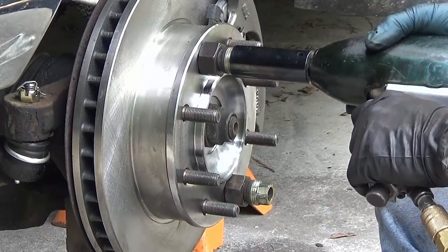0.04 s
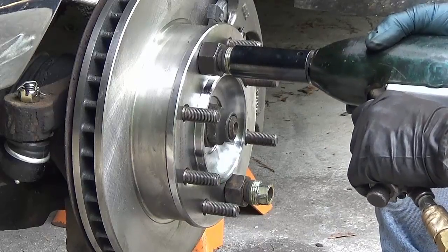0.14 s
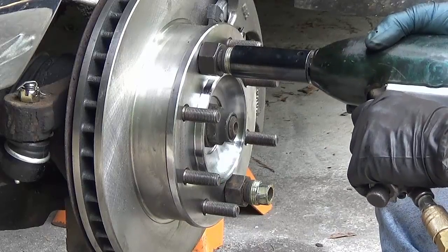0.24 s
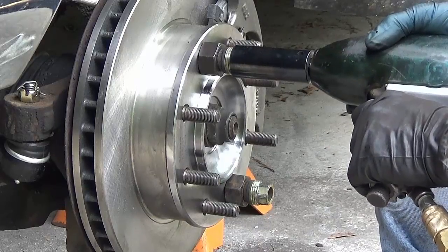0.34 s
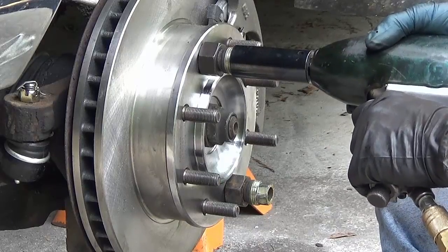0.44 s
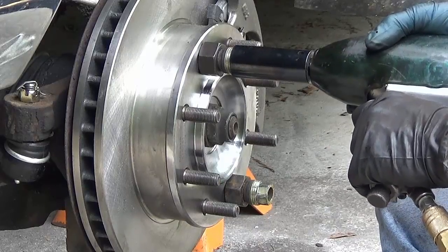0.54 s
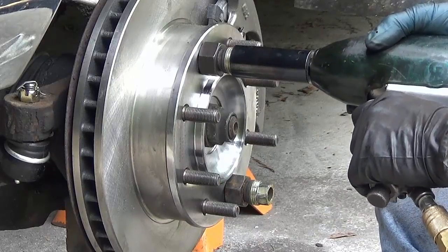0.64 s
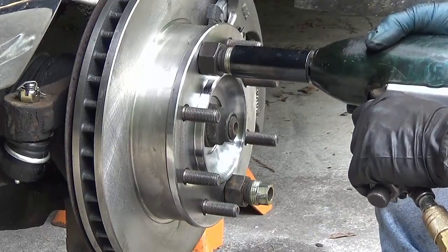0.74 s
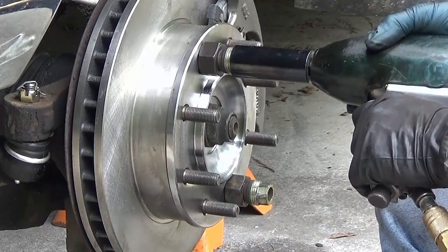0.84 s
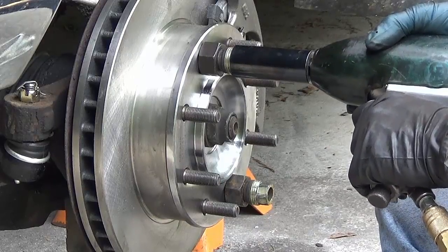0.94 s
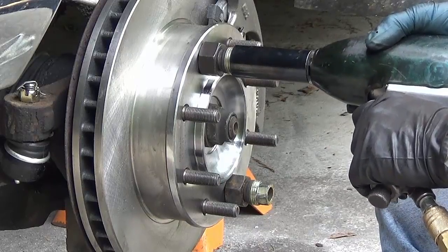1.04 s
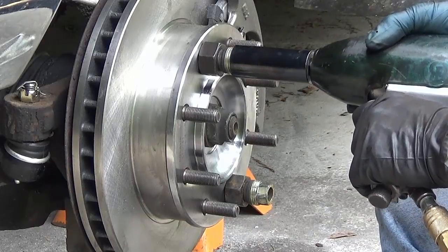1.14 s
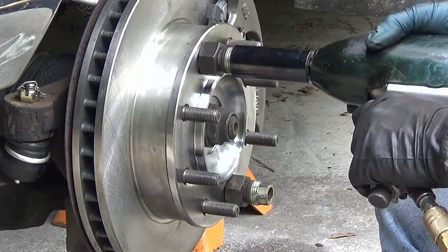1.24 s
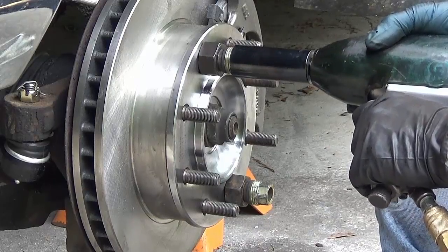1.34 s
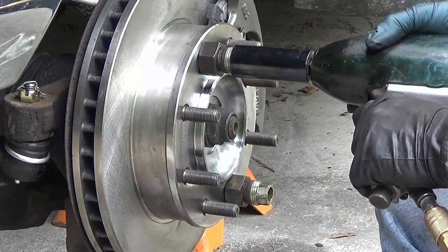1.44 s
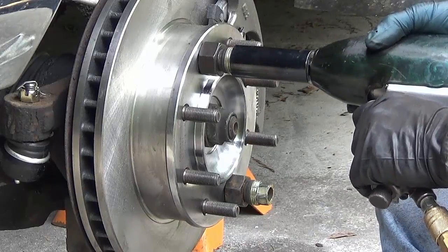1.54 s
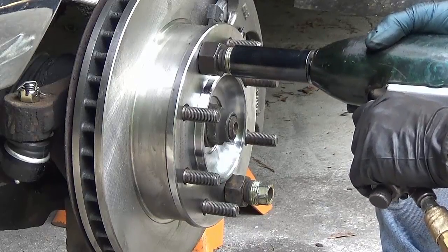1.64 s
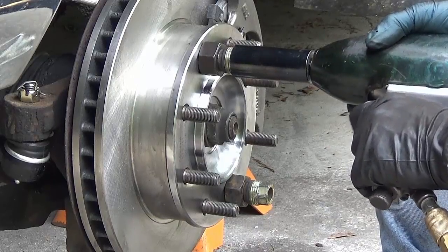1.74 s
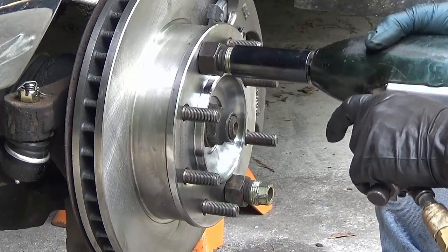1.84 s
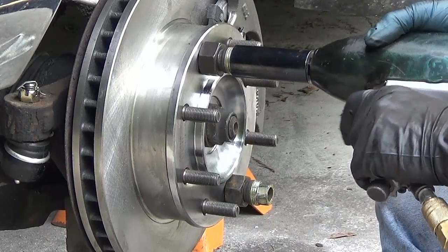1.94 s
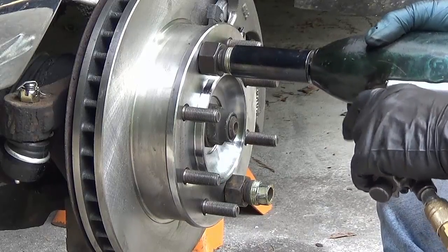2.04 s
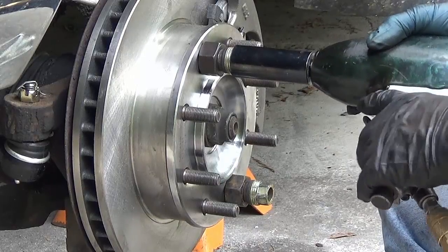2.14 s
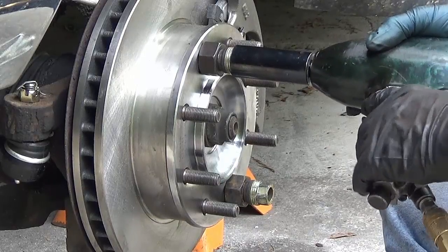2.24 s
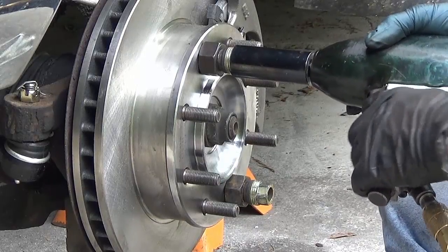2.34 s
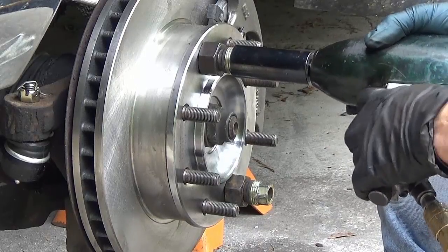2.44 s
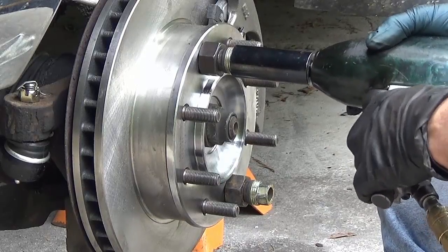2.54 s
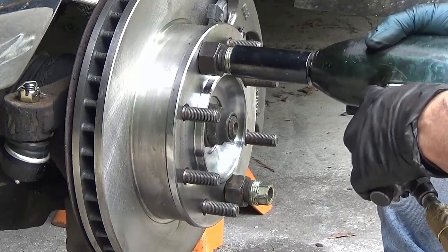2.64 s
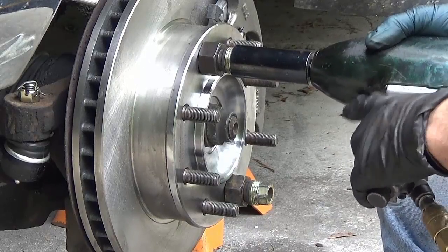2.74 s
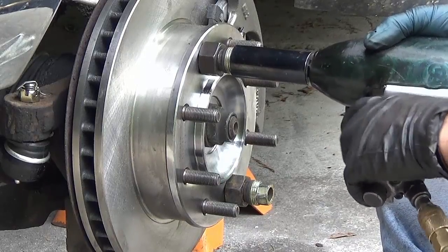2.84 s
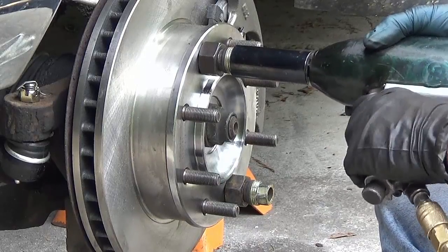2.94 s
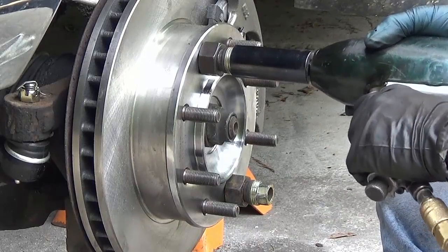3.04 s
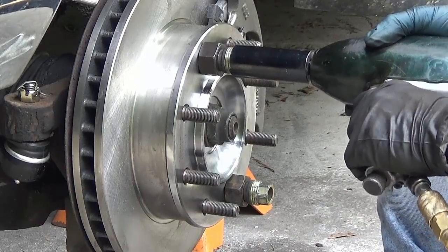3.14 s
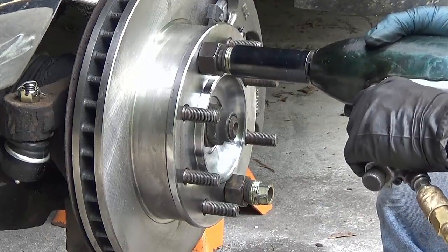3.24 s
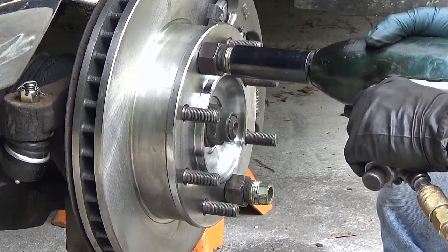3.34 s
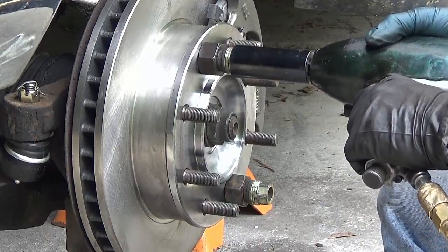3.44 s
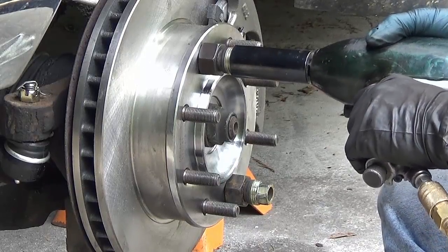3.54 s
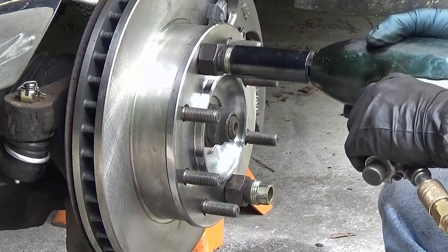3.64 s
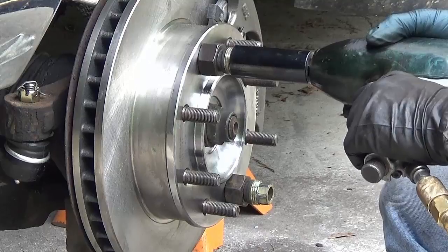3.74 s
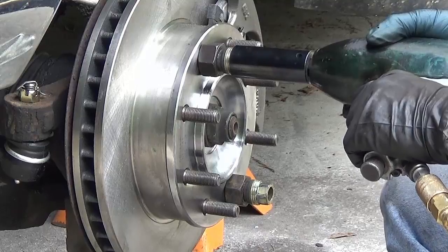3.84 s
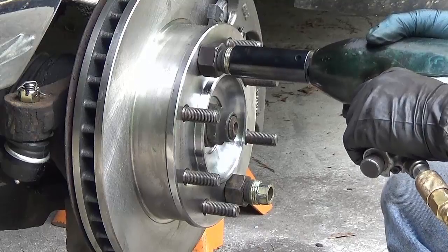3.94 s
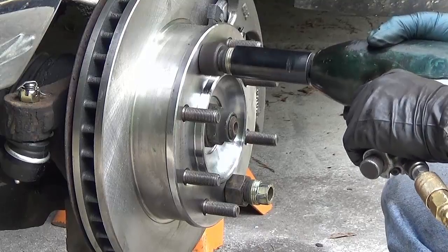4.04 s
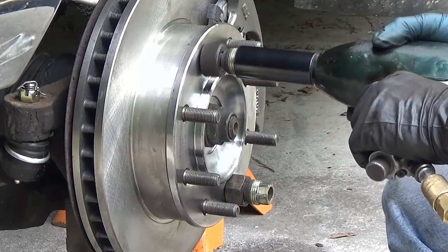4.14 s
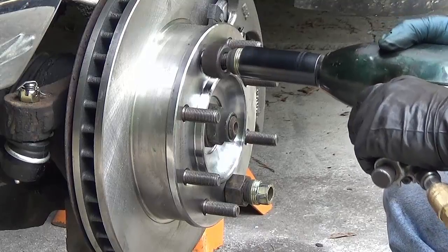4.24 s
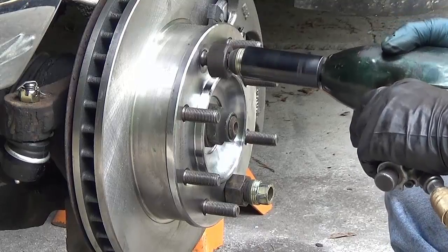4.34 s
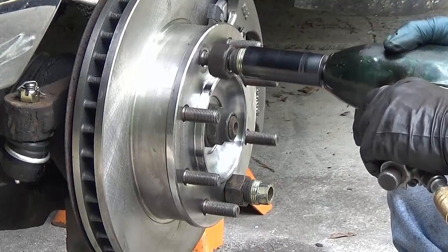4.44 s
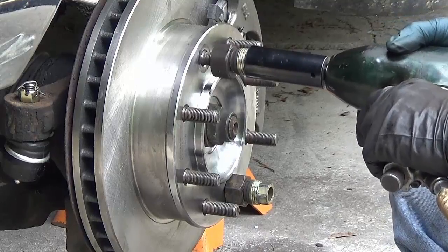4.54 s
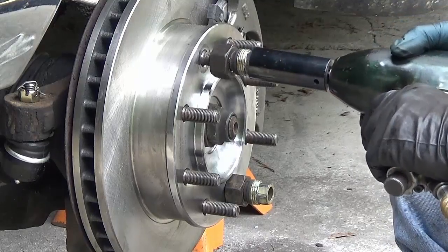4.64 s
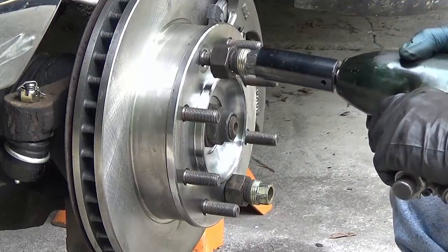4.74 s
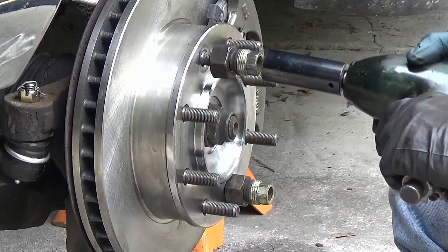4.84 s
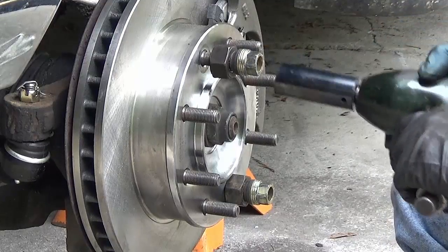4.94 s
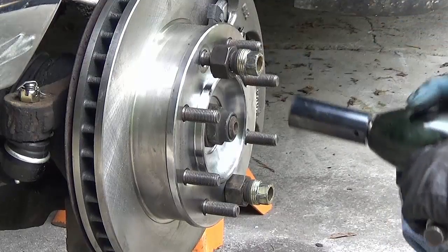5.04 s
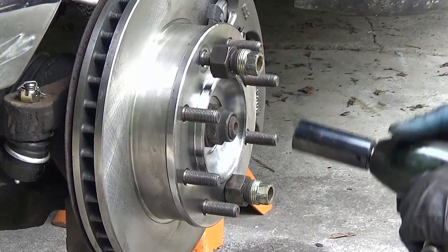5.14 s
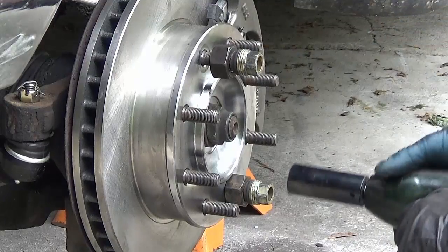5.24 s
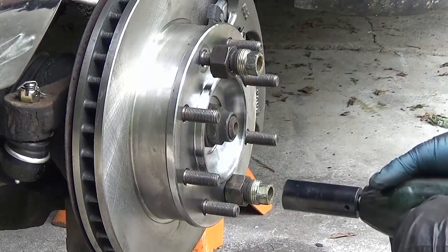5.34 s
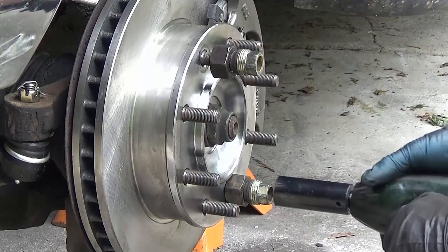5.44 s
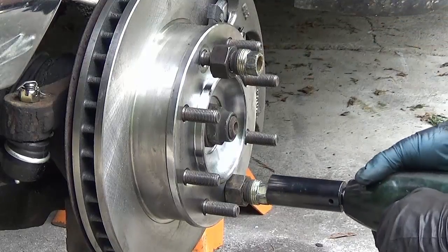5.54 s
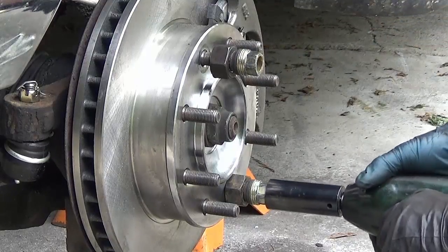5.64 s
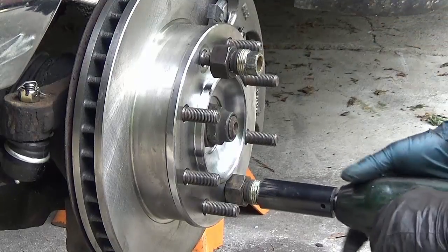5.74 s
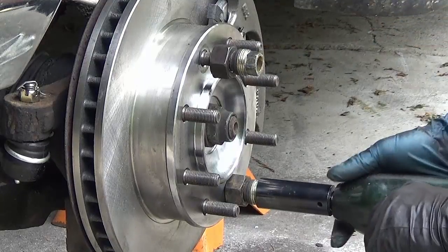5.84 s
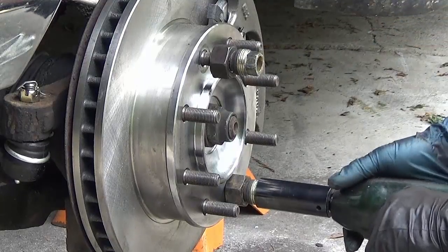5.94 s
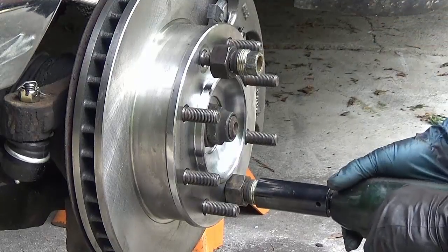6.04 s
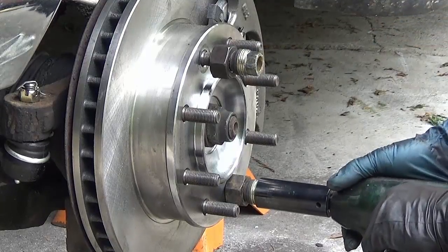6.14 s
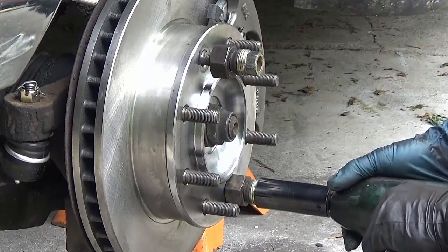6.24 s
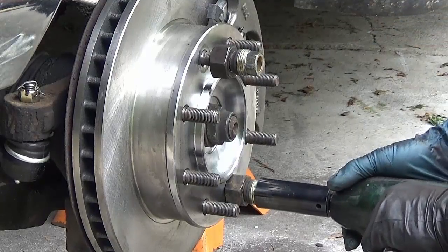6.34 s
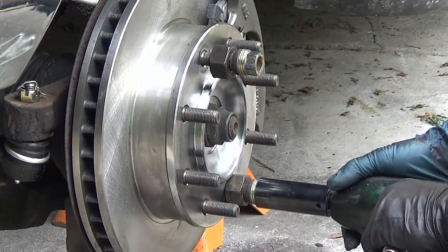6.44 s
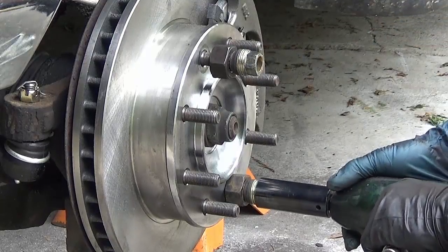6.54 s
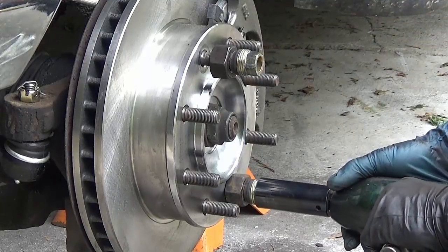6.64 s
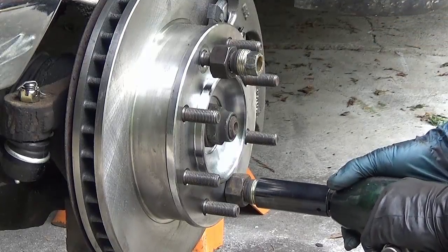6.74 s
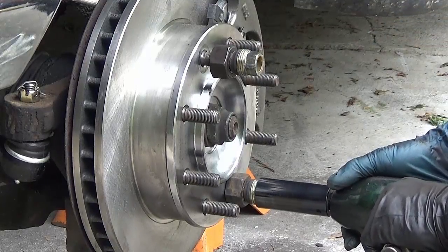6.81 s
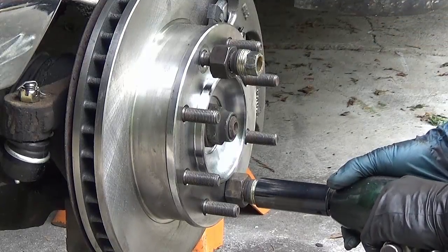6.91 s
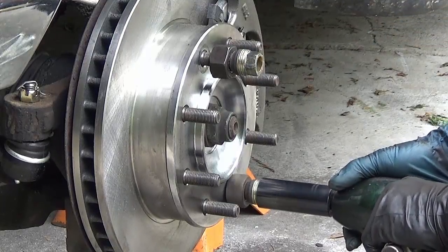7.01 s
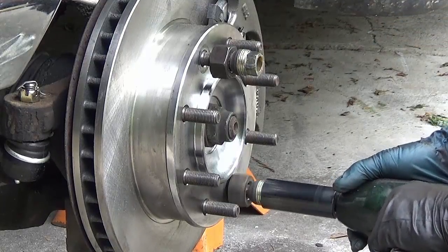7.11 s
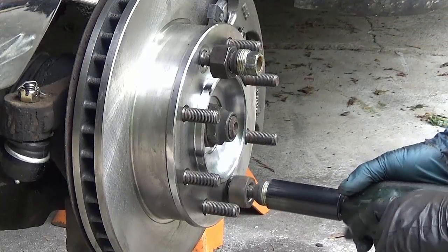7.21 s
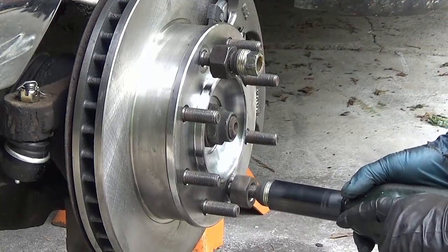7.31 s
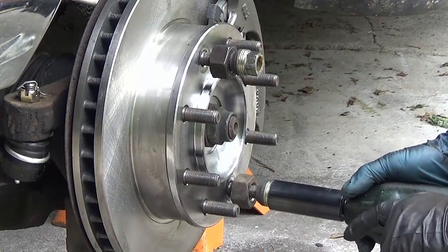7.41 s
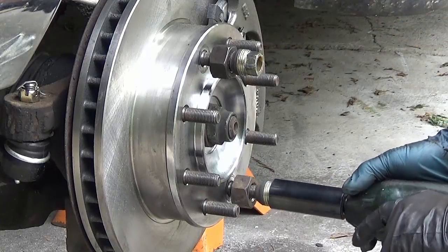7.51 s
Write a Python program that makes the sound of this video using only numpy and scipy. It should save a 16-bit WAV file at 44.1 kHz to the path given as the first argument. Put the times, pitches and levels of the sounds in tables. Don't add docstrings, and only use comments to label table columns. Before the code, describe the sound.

Loud, fast metallic hammering from a pneumatic wrench on a wheel nut stops, then resumes twice, each time loosening into a whirr and clicking coast-down.

```python
import sys
import numpy as np
from scipy import signal
from scipy.fft import rfft, irfft
from scipy.io import wavfile
from scipy.ndimage import uniform_filter1d, minimum_filter1d

SR = 44100
rng = np.random.default_rng(int(sys.argv[2]) if len(sys.argv) > 2 else 0)


def volts(x):
    e = np.asarray(x, float) / 20
    return 10 ** e


def store_wav(level_fs):
    pcm = np.round(np.clip(np.atleast_2d(level_fs), -1, 1) * 32767)
    wavfile.write(sys.argv[1], SR, pcm.T.astype(np.int16))


N = 333837


def evened(x):
    return x / np.sqrt(np.mean(x ** 2) + 1e-20)


def read(points, hz):
    f, value = np.transpose(points)
    return np.interp(np.log(hz + 1), np.log(f + 1), value)


def add(mix, start_s, sound):
    part = mix[max(round(start_s * SR), 0):][:len(sound)]
    part += sound[:len(part)]


def colour(x, spectrum):
    hz = abs(np.fft.fftfreq(4096, 1 / SR))
    log_gain = np.log(volts(np.maximum(read(spectrum, hz), -90)))
    taps = np.fft.ifft(np.exp(np.conj(signal.hilbert(log_gain)))).real[:2048]
    return signal.oaconvolve(x, taps / np.linalg.norm(taps))[:len(x)]


def resonate(x, hz, width_hz):
    r = np.exp(-np.pi * width_hz / SR)
    angle = 2 * np.pi * hz / SR
    gain = np.sqrt(2 * (1 - r * r)) * np.sin(angle)
    return signal.lfilter([gain], [1, -2 * r * np.cos(angle), r * r], x)


def ring_modes(x, modes):
    return sum(volts(db) * resonate(x, hz, width_hz) for hz, width_hz, db in modes)


def burst(t60, length=6000):
    return rng.standard_normal(length) * volts(-60 * np.arange(length) / SR / t60)


# frequency in Hz, level in dB per Hz.
GARAGE_COLOUR = [(20, -41), (45, -36), (90, -5.5), (170, -11), (300, -17), (600, -18), (1600, -22),
                 (2300, -26), (3100, -27), (3700, -29), (8000, -38.5), (10200, -38), (13000, -48),
                 (16000, -52)]


def garage():
    frames, hz = N // 256 + 5, np.fft.rfftfreq(1024, 1 / SR)
    a, b, c, d, patches = rng.standard_normal((frames, 513, 5)).T
    patches = evened(uniform_filter1d(uniform_filter1d(patches, 4, 0), 30, 1))
    shared, differing = a + 1j * b, c + 1j * d
    z = np.array([shared + side * 0.23 * differing for side in (1, -1)])
    z *= volts(read(GARAGE_COLOUR, hz)[:, None] + 2.3 * patches)
    wash = signal.istft(z, nperseg=1024, noverlap=768)[1][:, :N]
    return volts(-51.5) * evened(wash)


# frequency in Hz, t60 in seconds.
WALL_T60 = [(200, 0.32), (1000, 0.4), (4000, 0.16), (12000, 0.071)]
# frequency in Hz, left-right likeness from 0 to 1.
LIKENESS = [(100, 1), (600, 0.99), (2000, 0.98), (5000, 0.98), (9000, 0.98), (14000, 1)]


def walls(x):
    taps = np.zeros((2, SR // 2))
    at = np.arange(200, SR // 2 - 20, 20) + rng.integers(0, 20, (2, (SR // 2 - 201) // 20))
    np.put_along_axis(taps, at, rng.choice([-1., 1.], at.shape), 1)
    hz, t, z = signal.stft(taps, SR, nperseg=256)
    decay = volts(-60 * t / read(WALL_T60, hz)[:, None])
    tail = signal.istft(z * decay, SR, nperseg=256)[1]
    tail /= np.linalg.norm(tail[0])
    length = tail.shape[1]
    same = np.clip(read(LIKENESS, np.fft.rfftfreq(length, 1 / SR)), 0, 1)
    side = irfft(rfft(tail[0] - tail[1]) * np.sqrt(1 - same) * 3.1, length)
    return signal.fftconvolve(x[None], tail[0] + np.array([side, -side]), axes=1)[:, :N]


# time in seconds, level in dB.
LEAK_LEVEL = [(1.898, -48.5), (2.05, -57), (2.3, -56.5), (2.6, -52.5), (2.93, -53), (2.96, -59)]
# frequency in Hz, level in dB per Hz.
LEAK_HISS = [(1180, -66), (2000, -28.5), (2320, -4.5), (2930, -41.5), (3310, -7), (4150, -8), (4450, -6),
             (4900, -8), (5540, -1.5), (6820, -5.5), (7910, -9), (8630, -9), (11800, -10.5), (16000, -25)]
# frequency in Hz, width in Hz, level in dB.
VALVE_CAVITIES = [(4600, 220, -8), (5610, 240, -8), (6270, 180, -15)]


def leak():
    s, db = np.transpose(LEAK_LEVEL)
    t = np.arange(s[0], s[-1], 1 / SR)
    bands = ring_modes(rng.standard_normal(len(t)), VALVE_CAVITIES)
    hiss = colour(rng.standard_normal(len(t)), LEAK_HISS)
    return s[0], volts(np.interp(t, s, db)) * (hiss + bands)


# start in
# seconds, peak in dB, ring in Hz, brightness from 0 to 1.
TICKS = [(2.5356, -31, 1910, 0.5), (2.535, -25, 2900, 0.75), (2.943, -5, 2620, 0.18),
         (2.9667, -10.5, 5650, 0.8), (3.031, -4.5, 7100, 0.1), (4.239, 0, 9800, 0.95),
         (4.2826, -11, 9100, 0.96), (4.2955, -13, 8600, 0.9), (4.305, 0.5, 7160, 0.95),
         (4.394, -18, 5500, 0.9), (4.443, -19, 13500, 0.4), (4.454, -26, 13450, 0.7),
         (4.4931, -24.5, 2500, 0.46), (4.558, -37, 2160, 0.65), (4.6394, -33.5, 2420, 0.4),
         (4.781, -27, 2900, 0.1), (5.1716, -41, 3050, 0.2), (7.1677, -6.5, 10100, 0.8),
         (7.209, -10, 7600, 0.7), (7.2253, -5.5, 9800, 0.95), (7.317, -13.5, 5300, 0.64),
         (7.343, -10, 8450, 0.2), (7.387, -12, 2670, 0.6), (7.442, -18, 5930, 0.5),
         (7.485, -22.5, 5700, 0.4), (7.5301, -27.5, 5570, 0.1)]
# start in seconds, peak in dB, ring in Hz, brightness from 0 to 1.
GRAZES = [
    (5.6282, -35, 2950, 0),
    (5.7529, -27, 2600, 0.2),
    (5.9044, -33, 2220, 0),
]
# frequency in Hz, width in Hz, level in dB.
CLUTCH = [(2360, 47, -2.5), (5990, 136, 2), (9400, 110, -4), (13450, 60, -8)]
# frequency in Hz, level in dB per Hz.
BRIGHT_STEEL = [(600, -33), (1500, -8), (2500, 1), (4500, 0.5), (7000, 1.5), (9600, 3), (12000, -5),
                (16000, -11.5)]
# frequency in Hz, level in dB per Hz.
DULL_TOUCH = [(800, -14), (1800, -12.5), (2800, -5.5), (7000, -16), (10000, -36.5), (16000, -37)]


def ticks():
    out = np.zeros(N)
    for s, db, hz, bright in TICKS + GRAZES:
        snap, bright = burst(0.058), np.clip(bright, 0, 1)
        bright_part = colour(snap, BRIGHT_STEEL) + 0.49 * ring_modes(snap, CLUTCH)
        body = bright * bright_part + (1 - bright) ** 2 * colour(snap, DULL_TOUCH)
        add(out, s, volts(db - 11.5) * (body + 0.48 * resonate(snap, hz, 320)))
    return out


# start in seconds, peak in dB.
KNOCKS = [
    (5.494, -20),
    (5.642, -25),
    (5.763, -11.5),
]
# frequency in Hz, width in Hz, level in dB.
TUBE_MODES = [
    [(2550, 100, 8.5), (2480, 150, -3), (2900, 290, -5.5), (4250, 180, -7), (5800, 110, -1),
     (6200, 210, -25), (10400, 120, -38), (11900, 100, -34), (14200, 130, -29)],
    [(2700, 110, -10), (2900, 140, 2.5), (3700, 400, 0), (5850, 150, -11), (6800, 84, -3),
     (10800, 100, -23), (13500, 110, -18), (14600, 100, -25)],
    [(1260, 180, -14), (2660, 200, -5), (3600, 440, -9), (4230, 350, 0), (5750, 100, -8), (6800, 150, -9),
     (7730, 180, -2), (9300, 180, -4), (10700, 170, -28), (13700, 96, -7)],
]
# frequency in Hz, level in dB, t60 in seconds.
DISC_RINGS = [(412, -17, 0.18), (490, -19, 0.24), (1240, -22, 0.17), (2465, -48, 0.08)]
# frequency in Hz, level in dB per Hz.
RATTLE_COLOUR = [(400, -42.5), (900, -15), (1800, -14.5), (2400, 5.5), (4000, -1.5), (5800, 0),
                 (7400, -5.5), (10400, -14), (16000, -18)]


def knocks():
    out, t = np.zeros(N), np.arange(12000) / SR
    for (s, db), modes in zip(KNOCKS, TUBE_MODES):
        settling = 0.58 * np.roll(burst(0.058, length=12000), 200)
        scuff = rng.standard_normal(12000) * (t < 0.008) * np.tanh(t / 0.0007)
        contact = settling + scuff
        disc = sum(volts(d - 60 * t / t60) * np.sin(2 * np.pi * (hz * t + rng.random()))
                   for hz, d, t60 in DISC_RINGS)
        swelling = 4.5 * disc * np.tanh(t / 0.037)
        knock = ring_modes(contact, modes) + 1.05 * colour(contact, RATTLE_COLOUR) + swelling
        add(out, s - 0.001, volts(db - 7.5) * knock)
    return out


FULL_AIR_DB = -20
# time in seconds, air flow in dB, vane puffs in Hz at full spin.
BURSTS = [
    [(0, -16, 172.2), (1.2, -20, 172), (1.75, -18.5, 167), (1.81, -30, 146), (1.9, -62, 102)],
    [(2.935, -47, 154), (2.965, -17.5, 170.3), (3.97, -16.5, 183.3), (4.07, -18.5, 228.5),
     (4.12, -16.5, 291.7), (4.225, -25.5, 345.4), (4.245, -44, 266), (4.31, -30.5, 198.7),
     (4.55, -52.5, 149)],
    [(5.895, -51, 126), (5.945, -13, 171), (6.925, -17.5, 167.9), (7.03, -15.5, 285), (7.085, -15, 315.4),
     (7.145, -22, 391), (7.165, -25, 338), (7.3, -30, 200), (7.57, -57, 159.6)],
]
# rebound in dB, cam tick in dB, thump under load in dB.
NUTS = [
    (-11.5, -16.5, -0.5),
    (-11, -11.5, 0),
    (-11, -13, 3),
]
# level in dB at the first blow, level in dB at the last.
HUB_DB = [
    (-37.5, -35.5),
    (-47, -38),
    (-52, -44),
]
# frequency in Hz, width in Hz.
HUB_RING = (389, 42)
# frequency in Hz, width in Hz, level in dB.
THROAT = (1564, 570, -3)
# frequency in Hz, level in dB.
MUFFLER = [(60, -40.5), (130, -8), (230, 7), (330, -10), (560, 4), (800, -10), (1400, -6), (1900, -3.5),
           (2400, -27.5), (3500, -24)]
# frequency in Hz, level in dB per Hz.
EXHAUST = [(40, -32), (100, -5), (300, 1.5), (800, -6), (1400, -5.5), (2500, -4), (4100, 0), (7000, -6),
           (10000, -5), (16000, -28.5)]
# lead in seconds before the blow, signed strength.
JOLTS = [
    (.017, 0.7),
    (.0055, -0.9),
]


def vane_puffs(port, turns, loose, air_db, puff_db, pressure):
    sung = evened(resonate(resonate(port, *THROAT[:2]), *THROAT[:2]))
    throat = loose * volts(THROAT[2] + 0.67 * np.minimum(air_db - FULL_AIR_DB, 0)) * sung
    hum = loose * volts(-12.5) * np.cos(2 * np.pi * turns)
    return volts(puff_db) * uniform_filter1d(pressure, 60) * (evened(colour(port, MUFFLER)) + throat - hum)


def exhaust_hiss(turns, uneven, spin, air_db):
    gusts = 0.61 + 0.27 * np.exp(-(turns % 1) / 0.16) * uneven
    return volts(air_db) * spin ** 0.6 * colour(gusts * rng.standard_normal(len(turns)), EXHAUST)


def hub_ring(hub_db, shaking):
    noise = rng.standard_normal(len(hub_db))
    ring = evened(resonate(resonate(noise, *HUB_RING), *HUB_RING))
    return volts(hub_db) * uniform_filter1d(shaking, 200) * ring


def case_thump(until, thump_db):
    thump_hz, width_s = 331, 0.0026
    jolts = 0
    for lead, strength in JOLTS:
        x = until - lead
        jolts = jolts + strength * np.exp(-(x / width_s) ** 2) * np.cos(2 * np.pi * thump_hz * x)
    return volts(thump_db) * jolts


def motor(rows, blows, nut, ring_db):
    s, *columns = np.transpose(rows)
    t = np.arange(s[0], s[-1], 1 / SR)
    air_db, hz = (np.interp(t, s, c) for c in columns)
    loose = np.maximum.accumulate(np.clip((hz - 185.8) / 23.1, 0, 1))
    driven = np.clip(1.5 + (air_db - FULL_AIR_DB) / 4, 0, 1)
    stall = np.clip(0.75 * (1 - loose) + 0.1595 * loose * driven, 0, 1)

    hits = np.r_[-1, np.transpose(blows)[0], N / SR + 1]
    first_s, last_s = hits[1], hits[-2]
    after = np.searchsorted(hits, t)
    since, until = t - hits[after - 1], hits[after] - t

    spin = 1 - stall * np.exp(-(since / 0.038) ** 2)
    flutter = 1 + 0.02 * uniform_filter1d(rng.standard_normal(len(t)), 150)
    turns = np.cumsum(hz * spin * flutter) / SR
    turns -= np.interp(hits[after] - 0.006, t, turns)
    uneven = 1 + stall * (1 - loose) * 0.55 * np.cos(np.pi * turns)
    port = -sum(np.cos(2 * np.pi * k * turns) for k in range(1, 14)) * uneven

    lag_s = 0.039 * (1 - loose) + 0.028 * loose
    refill = 1 - 0.94 * np.exp(-(since / lag_s) ** 2)
    climb = 1 + 1.54 * stall * np.exp(-((until - 0.016) / 0.0037) ** 2)

    slow_db, fast_db, knee_hz = -35.5, -18.5, 68.6
    fast = np.tanh(np.maximum(hz - 170, 0) / knee_hz)
    puff_db = slow_db + (fast_db - slow_db) * fast + np.minimum(air_db + 35, 0)
    puff_db = puff_db + nut[2] * (1 - loose) - 9.5 * np.clip((t - last_s) / 0.01, 0, 1)
    puffs = vane_puffs(port, turns, loose, air_db, puff_db, refill * climb)
    hiss = exhaust_hiss(turns, uneven, spin, air_db)

    hub_db = np.interp(t, [first_s, last_s], ring_db) + 1 * loose * (t < last_s)
    hub_db = hub_db - 251.5 * np.maximum(since - 0.039, 0)
    shaking = 1 + 0.26 * (climb - 1) - 0.13 * (1 - refill) * (t < last_s)
    hub = hub_ring(hub_db, shaking)
    thump = (since < 0.2) * (1 - loose) * driven * case_thump(until, -24 + nut[2])
    return s[0], puffs + hiss + hub + thump


# start in seconds, blow in dB.
TIGHTEN = [(0.0073, -4.5), (0.0819, -4), (0.1552, -7.5), (0.2296, -3.5), (0.3044, -4.5), (0.3762, -2.5),
           (0.447, -6), (0.5225, -8.5), (0.5989, -9), (0.673, -8.5), (0.7499, -5), (0.8269, -11),
           (0.9039, -10), (0.9785, -4.5), (1.055, -4.5), (1.1329, -10.5), (1.2101, -6), (1.2872, -8.5),
           (1.3634, -11), (1.4392, -5), (1.516, -4.5), (1.5911, -8), (1.6679, -1), (1.744, -4.5),
           (1.8234, -6)]
UNDO_UPPER = [(2.9913, -4), (3.064, -8), (3.1385, -2), (3.2135, -6), (3.2891, -8.5), (3.3614, -11),
              (3.439, -8.5), (3.5096, -6.5), (3.583, -6), (3.6509, -5), (3.719, -5.5), (3.7864, -12.5),
              (3.8549, -15), (3.9171, -14.5), (3.981, -20), (4.0322, -6.5), (4.08, -13.5), (4.1324, -9),
              (4.1826, -8.5), (4.2393, -13), (4.304, -17)]
UNDO_LOWER = [(5.9514, -4), (6.02, -0.5), (6.0964, -10), (6.171, -2.5), (6.2447, -2), (6.3178, -7),
              (6.3893, -15), (6.4594, -14), (6.528, -10), (6.5958, -14), (6.6623, -10), (6.7328, -15),
              (6.7972, -11), (6.8638, -16), (6.928, -18), (6.9816, -17), (7.0343, -12), (7.0924, -7),
              (7.148, -20.5), (7.2257, -21)]
BLOWS = [TIGHTEN, UNDO_UPPER, UNDO_LOWER]
# frequency in Hz, width in Hz, level in dB.
STEEL_MODES = [(1627, 28, -8), (1900, 87, -3.5), (2275, 55, 5.5), (2576, 62, 5.5), (2868, 42, 1.5),
               (3620, 100, -28), (4120, 65, 2), (4350, 46, -1.5), (4903, 18, -1), (5706, 80, -2.5),
               (6430, 170, -3.5), (7650, 360, -3.5), (9700, 190, 3.5), (13450, 90, -15)]


def steel_rattle():
    age = np.arange(6000) / SR
    chatter = volts(3.5 * evened(uniform_filter1d(rng.standard_normal(6000), 40)))
    hold = volts(60 * np.minimum(age - 0.01, 0) / 0.079)
    return burst(0.076) * np.tanh(age / 0.0005) * hold * chatter


def hammer():
    clang, bright, ring = np.zeros((3, N))
    rebound_s, cam_s = 0.029, 0.0105
    for blows, rows, (rebound_db, cam_db, _) in zip(BLOWS, BURSTS, NUTS):
        at, air_db, _ = np.transpose(rows)
        for k, (s, blow_db) in enumerate(blows):
            rattle = steel_rattle()
            crack = volts(2.5) * burst(0.0079)
            add(clang, s, volts(blow_db) * (rattle + crack))

            air = np.interp([s + rebound_s, s - cam_s], at, air_db)
            weakening = 0.8 * np.minimum(air - FULL_AIR_DB, 0)
            late, early = weakening + 1.5 * rng.standard_normal(2)
            rebound = (k < len(blows) - 1) * volts(rebound_db + late) * burst(0.051)
            add(bright, s + rebound_s + 0.001 * rng.standard_normal(), rebound)
            add(bright, s - cam_s, (k > 0) * volts(cam_db + early) * burst(0.088))

            shift = 1.5 * rng.standard_normal(len(STEEL_MODES))
            struck = [(hz * (1 + d / 100), w, db + d) for (hz, w, db), d in zip(STEEL_MODES, shift)]
            add(ring, s, volts(blow_db - 12.5) * ring_modes(rattle, struck))
    return colour(clang, RATTLE_COLOUR) + colour(bright, BRIGHT_STEEL) + ring


def scene():
    near = hammer() + ticks() + knocks()
    for pull in zip(BURSTS, BLOWS, NUTS, HUB_DB):
        add(near, *motor(*pull))
    add(near, *leak())
    return near + volts(-14.5) * walls(near) + garage()


def band_limit(x):
    return signal.sosfilt(signal.butter(12, 16830, fs=SR, output="sos"), x)


def record(dry):
    power_db = 10 * np.log10(abs(uniform_filter1d((dry ** 2).mean(0), 24)) + 1e-12)
    ahead_db = -minimum_filter1d(np.r_[-power_db[50:], np.zeros(50) + 99], size=101)
    fall = np.arange(N) * 276.0 / SR
    held_db = np.maximum.accumulate(ahead_db + fall) - fall
    over_db = np.maximum(held_db + 14, 0)
    ceiling = 1.2
    ducked = dry / volts(0.67 * uniform_filter1d(over_db, 30))
    clipped = ceiling * np.tanh(ducked / ceiling)
    low_pass = signal.firwin(301, 15900, window=("kaiser", 9), fs=SR)
    finished = signal.oaconvolve(clipped, low_pass[None], "same")
    return band_limit(finished)


dry = scene()
out = record(dry)
store_wav(out)
```